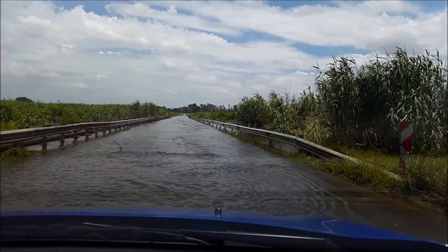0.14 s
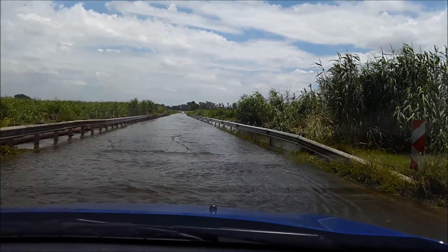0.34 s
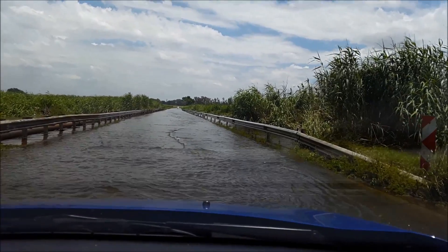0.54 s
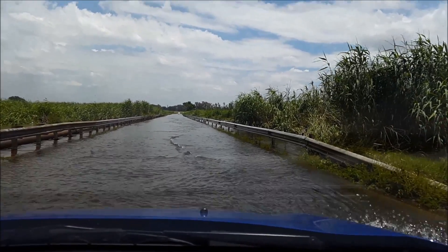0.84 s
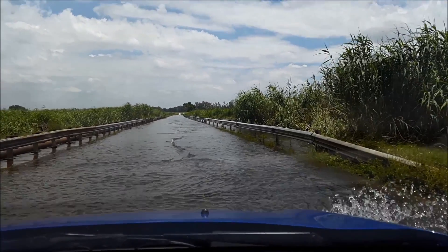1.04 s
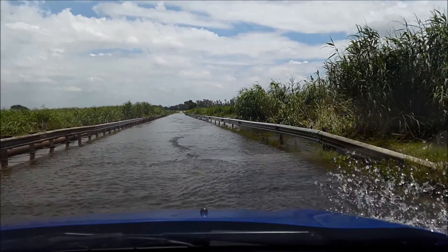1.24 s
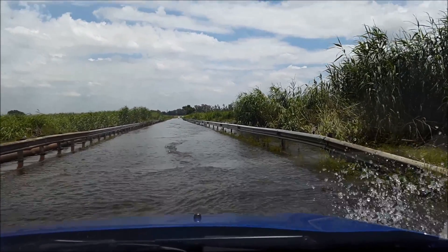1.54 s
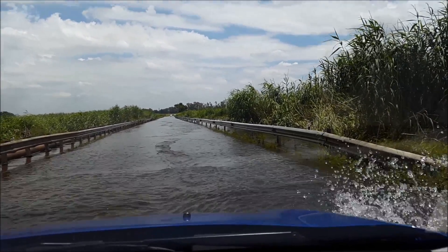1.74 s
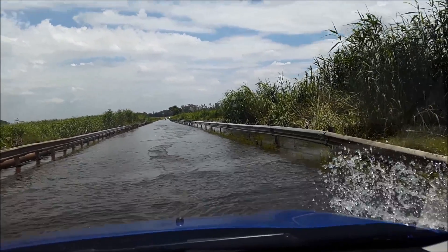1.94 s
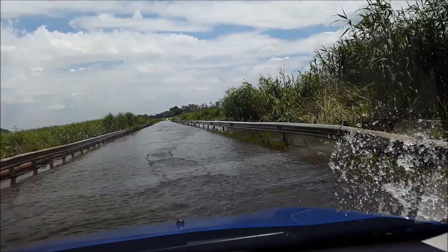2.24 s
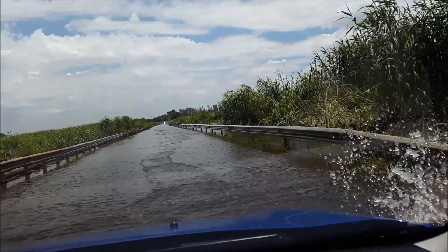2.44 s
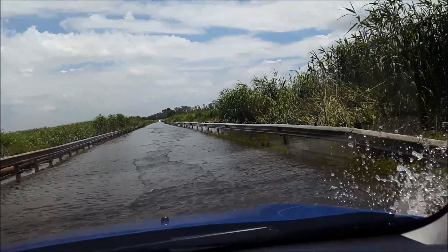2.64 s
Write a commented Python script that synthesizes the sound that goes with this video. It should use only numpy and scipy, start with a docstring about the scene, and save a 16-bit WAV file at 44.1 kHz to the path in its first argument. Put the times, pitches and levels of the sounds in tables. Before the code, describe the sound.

Floodwater sloshes, bubbles and slaps dully against a car driving slowly, heard inside the closed cabin. Deep rumble and soft floor thumps continue throughout, with splashing thickening on the right and a faint steady whirr there.

```python
"""Flood water sloshes and thumps against a car that wades slowly along a flooded road, heard inside.
The right front wheel throws the water up and the closed windows muffle it: coloured noise, bubbles, slaps.
The cabin rumbles in three bands of low noise, and short cosines that swell and fade thump the floor.
Fine spray grows as the water deepens; air gulps in the wheel arch as gliding tones.
A steady narrow noise whirrs far to the right, with a faint hiss and whine above it and one tiny click."""
import sys
import numpy as np
from scipy import signal
from scipy.fft import rfft, irfft
from scipy.io import wavfile
from scipy.ndimage import uniform_filter1d

SR = 44100
rng = np.random.default_rng(int(sys.argv[2]) if len(sys.argv) > 2 else 0)


def int16_out(signal):
    """Quantize to a 16-bit WAV file."""
    q = np.round(np.clip(np.atleast_2d(signal).T, -1, 1) * 32767)
    wavfile.write(sys.argv[1], SR, q.astype(np.int16))


N = 123480
T, HZ = np.arange(N) / SR, np.fft.rfftfreq(N, 1 / SR)


def amp(db):
    """Decibels to gain."""
    return 10 ** (np.asarray(db) / 20)


def evened(x):
    """Scales to an rms of one."""
    return x / np.sqrt(np.mean(x ** 2) + 1e-20)


def read(points, hz):
    """Reads a table over frequency, in straight lines on a log-frequency axis."""
    f, value = np.transpose(points)
    return np.interp(np.log(hz + 1), np.log(f + 1), value)


def level(points):
    """Gain over time from rows of seconds and dB."""
    return amp(np.interp(T, *np.transpose(points)))


def pan(db):
    """Left and right gains of mean power one; positive dB leans left."""
    gains = np.array([amp(np.atleast_1d(db) / 2), amp(-np.atleast_1d(db) / 2)])
    return gains / np.sqrt(np.mean(gains ** 2, 0))


def add(mix, s, sound):
    """Mixes a stereo sound in at a time, cut at the end of the mix."""
    part = mix[:, round(s * SR):][:, :sound.shape[1]]
    part += sound[:, :part.shape[1]]


def alike(a, b, same):
    """Left and right from two independent noises; same = 1 makes the sides equal, 0 unrelated."""
    return np.array([a, same * a + np.sqrt(1 - same ** 2) * b])


def noise(spectrum, same=0, pan_db=0):
    """Stereo noise of rms one with a given colour, likeness of the sides and balance."""
    a, b = rfft(rng.standard_normal((2, N)))
    coloured = alike(a, b, same) * pan(pan_db) * amp(read(spectrum, HZ))
    return evened(irfft(coloured, N))


def wander(rate_hz):
    """Random drift of rms one, slower than about rate_hz and centred on zero."""
    lowpass = np.exp(-(HZ / rate_hz) ** 2) * (HZ > 0)
    return evened(irfft(rfft(rng.standard_normal(N)) * lowpass, N))


def steadied(x, size):
    """Evens out the chance swells of a noise with a running rms over size samples."""
    running_rms = np.sqrt(uniform_filter1d((x ** 2).mean(0), size) + 1e-9)
    return evened(x / running_rms)


def rumble():
    """Low noise bands: the body shudders, the cabin booms, the wet tyres drone; water thumps the floor."""
    # Deep shudder of the car body. Each row: frequency in Hz, relative level in dB per Hz.
    shudder_colour = [(5, -19.5), (14, -5.5), (23, -6), (30, -0.5), (38, 0.5), (50, -24), (90, -47.5),
                      (300, -94.5)]
    # Rise and fall of the shudder. Each row: time in seconds, level in dB.
    shudder_level = [(0, -22), (.15, -42.5), (.3, -26.5), (.55, -31.5), (.75, -29.5), (1.03, -36.5),
                     (1.35, -27.5), (1.45, -35), (1.55, -26), (1.65, -33.5), (2.0, -28), (2.12, -28),
                     (2.35, -30.5), (2.45, -23.5), (2.58, -38), (2.76, -30)]
    # Cabin boom. Each row: frequency in Hz, relative level in dB per Hz.
    boom_colour = [(8, -30.5), (25, -18.5), (45, 0.5), (63, 1), (78, -2), (92, -1), (112, -12.5),
                   (135, -21.5), (200, -43), (600, -94)]
    # Rise and fall of the boom. Each row: time in seconds, level in dB.
    boom_level = [(0, -32.5), (.22, -34.5), (.35, -35.5), (.52, -31), (.62, -34.5), (.72, -34.5),
                  (.85, -32.5), (1.15, -31.5), (1.27, -29.5), (1.48, -31), (1.56, -34), (1.7, -25),
                  (1.78, -34), (1.88, -25.5), (2.08, -27.5), (2.33, -32), (2.46, -30.5), (2.66, -28),
                  (2.78, -32)]
    # Drone of the wet tyres. Each row: frequency in Hz, relative level in dB per Hz.
    drone_colour = [(40, -22), (100, -9), (125, -0.5), (155, 2), (185, -9), (215, -4), (280, -14.5),
                    (450, -27.5), (900, -52.5), (2000, -87.5)]
    # Rise and fall of the drone. Each row: time in seconds, level in dB.
    drone_level = [(0, -41), (.16, -43), (.42, -46.5), (.56, -42.5), (.85, -45), (1.16, -44), (1.38, -46.5),
                   (1.47, -41.5), (1.68, -45), (1.88, -40.5), (2.17, -42), (2.35, -44), (2.64, -41.5),
                   (2.78, -42)]
    # Likeness of the two sides. Each row: frequency in Hz, likeness from 0 to 1.
    likeness = [(20, 0.99), (90, 0.93), (140, 0.65), (220, 0.83), (400, 0.65), (900, 0.51)]
    # Balance of the rumble. Each row: frequency in Hz, left minus right in dB.
    balance = [(20, -0.5), (90, -3), (160, -3), (220, -4.5), (300, -7.5), (900, 0.5)]
    # Heavy water on the floor pan. Each row: swell centre in seconds, level in dB, pitch in Hz.
    thumps = [(0.183, -23, 62), (0.284, -21.5, 52), (0.347, -22.5, 80), (0.407, -19.5, 52),
              (0.8, -27, 95.5), (0.955, -25, 80), (1.293, -24, 50.6), (1.4, -27, 56), (1.562, -21.5, 51.5),
              (1.685, -19.5, 61.3), (1.922, -12.5, 50.5), (2.021, -20.5, 54.8), (2.096, -16, 49.8),
              (2.191, -21, 57.7), (2.415, -22, 54.7), (2.545, -22, 76), (2.705, -20, 62)]
    thump_half_s, thump_pan_db = .016, -2
    takeover = .45  # share of the steady boom that gives way to a thump

    same, side = read(likeness, HZ), read(balance, HZ)
    shudder = steadied(noise(shudder_colour, same, side), size=4000) * level(shudder_level)
    boom = steadied(noise(boom_colour, same, side), size=2400) * level(boom_level)
    drone = steadied(noise(drone_colour, same, side), size=3500) * level(drone_level)
    for s, db, hz in thumps:
        swell = np.exp(-((T - s) / thump_half_s) ** 2)
        thump = -pan(thump_pan_db) * amp(db) * np.cos(2 * np.pi * hz * (T - s))
        boom = boom * (1 - takeover * swell) + thump * swell
    return shudder + boom + drone


def bubbles():
    """A swarm of short rising rings at random times; each pitch has its own place."""
    per_s, pitches, decay_cycles = 260, 24, 5.6  # per_s counts all pitches together
    spread_db = 1  # scale of a bubble's random boost, capped at three times this
    out, t = np.zeros((2, N)), np.arange(SR // 10) / SR
    for hz in np.geomspace(327.4, 1022, num=pitches):
        age = t * hz / decay_cycles
        rising = np.sin(2 * np.pi * hz * t * (1 + 0.036 * age))
        ring = (1 - np.exp(-age * 4)) * np.exp(-age) * rising
        hits = rng.random(N) < per_s / pitches / SR
        sizes = amp(spread_db * np.minimum(rng.exponential(1, N), 3))
        voice = signal.oaconvolve(hits * sizes, ring)[:N] * hz ** -.6  # higher pitches are weaker
        place, polarity = pan(rng.normal(-7.5, 5.9)), rng.choice([-1, 1], (2, 1))
        out += place * polarity * voice
    return evened(out)


def wash():
    """Churning noise and bubbles under the car swell together; spray grows as the water deepens."""
    # Water heard through the body. Each row: frequency in Hz, relative level in dB per Hz.
    churn_colour = [(100, -24), (250, 1), (370, 4), (500, -5.5), (680, -4.5), (850, -8.5), (1020, -14),
                    (1250, -19), (1550, -18.5), (2100, -24), (2500, -29), (2950, -37.5), (3600, -47.5),
                    (4500, -58), (8000, -67.5)]
    # Balance of the churn. Each row: frequency in Hz, left minus right in dB.
    churn_balance = [(250, -5), (400, -5.5), (550, -6.5), (700, -9), (1000, -7.5), (1500, -6.5), (3000, -6)]
    # Swell of churn and bubbles together. Each row: time in seconds, level in dB.
    wash_level = [(0, -56.5), (.2, -58), (.45, -54.5), (.7, -54), (1, -54), (1.25, -53.5), (1.4, -55),
                  (1.53, -53.5), (1.72, -54.5), (1.87, -53), (2.08, -53), (2.2, -50.5), (2.32, -52.5),
                  (2.4, -50), (2.52, -50), (2.78, -53)]
    # Fine spray on the side of the car. Each row: frequency in Hz, relative level in dB per Hz.
    spray_colour = [(800, -16), (1500, 3), (2300, 2), (2900, -13.5), (3600, -16), (4500, -31),
                    (8000, -41.5)]
    # Growth of the spray. Each row: time in seconds, level in dB.
    spray_level = [(0, -86.5), (1.1, -81), (1.8, -74.5), (2, -73), (2.45, -73.5), (2.78, -72)]
    bubbles_db = -10  # against the churn

    churn = noise(churn_colour, same=0.26, pan_db=read(churn_balance, HZ))
    churn = churn * amp(0.68 * wander(rate_hz=19))
    spray = noise(spray_colour, pan_db=-6) * level(spray_level)
    spray = spray * amp(1.6 * wander(rate_hz=45))
    return (churn + amp(bubbles_db) * bubbles()) * level(wash_level) + spray


def whirr():
    """A narrow, fluttering band of noise, far to the right, with a few brief rises in level."""
    # Colour of the whirr. Each row: frequency in Hz, relative level in dB per Hz.
    whirr_colour = [(900, -42), (1400, -20.5), (1600, -8.5), (1770, -10), (1900, 0), (2050, 2), (2200, 0.4),
                    (2400, -7.5), (2650, -13), (2780, -27), (2900, -36.5), (3150, -44.5), (3520, -38),
                    (4000, -56), (6000, -82)]
    # Slow changes of the whirr. Each row: time in seconds, level in dB.
    whirr_level = [(0, -50), (.55, -49), (1.28, -49.5), (1.43, -50.5), (1.55, -49.5), (1.75, -50.5),
                   (1.93, -49), (2.25, -49.5), (2.6, -49.5), (2.78, -50.5)]
    # Brief rises in level. Each row: centre in seconds, rise in dB, half length in seconds.
    brief_rises = [(1.135, 8, 0.004), (1.266, 5, 0.0064), (1.945, 6.5, 0.0061)]
    left_db = -29  # against the right

    flutter_db = 0.49 * wander(rate_hz=69)
    for s, rise_db, half_s in brief_rises:
        flutter_db = flutter_db + rise_db * np.exp(-((T - s) / half_s) ** 2)
    return noise(whirr_colour) * amp([[left_db], [0]]) * level(whirr_level) * amp(flutter_db)


def hiss_and_whine():
    """Faint high noise with a thin sine whose pitch wavers at random."""
    # Colour of the hiss. Each row: frequency in Hz, relative level in dB per Hz.
    hiss_colour = [(1000, -33), (4200, -31), (5000, -21), (6000, -12.5), (7000, -7.5), (7650, -3),
                   (7930, 4), (8130, -1.5), (8450, 4), (9000, -11)]
    hiss_db, whine_db, whine_pan_db = -68.5, -78.5, -21.5
    whine_hz = 7960 + 6 * wander(rate_hz=23)

    whine = np.sin(2 * np.pi * np.cumsum(whine_hz) / SR)
    hiss = amp(hiss_db) * noise(hiss_colour, pan_db=-0.5)
    return hiss + amp(whine_db) * pan(whine_pan_db) * evened(whine)


def splashes():
    """Dull slaps of water in the wheel arch: soft-edged noise bursts, each around its own pitch."""
    # Slaps of water. Each row: start in seconds, level in dB, centre in Hz.
    slaps = [(.262, -38, 420), (.795, -40, 400), (.945, -42, 700), (1.055, -47, 602), (1.106, -36.5, 413),
             (1.252, -35, 570), (1.35, -33, 360), (1.465, -37.5, 595), (1.497, -44, 505), (1.53, -39, 450),
             (1.972, -45, 500), (2.008, -38.5, 480), (2.163, -36, 540), (2.222, -33, 520),
             (2.275, -38, 402), (2.345, -36.5, 480), (2.379, -34.5, 620), (2.595, -43.5, 450),
             (2.642, -34, 380), (2.742, -37, 360)]
    rise_s, t60_s, half_octaves, pan_db = 0.0092, 0.091, 0.54, -6

    out, t = np.zeros((2, N)), np.arange(SR // 5) / SR
    hz = np.fft.rfftfreq(len(t), 1 / SR) + 1  # kept above zero for the logarithm
    rise = 1 - np.exp(-t / rise_s)
    for s, db, centre in slaps:
        colour = np.exp(-(np.log2(hz / centre) / half_octaves) ** 2)
        a, b = irfft(rfft(rng.standard_normal((2, len(t)))) * colour, len(t))
        burst = steadied(alike(a, b, same=0.17), size=900)
        add(out, s, pan(pan_db) * burst / 2 * rise * amp(db - 60 * t / t60_s))
    return out


def tick():
    """One tiny sharp click of trim: a noise burst with a faint, slower tail from the cabin."""
    # Colour of the click. Each row: frequency in Hz, relative level in dB.
    click_colour = [(1500, -14.5), (3300, -0.5), (4000, -13), (4700, -3), (5500, -5), (6500, 10),
                    (7500, -0.5), (9000, -1)]
    start_s, rise_s, click_db, pan_db = .8405, 0.00058, -56.5, -14
    t60_s, tail_db, tail_t60_s = 0.018, -14, .09  # the tail level is against the click

    age = np.maximum(T - start_s, 0)
    fade = amp(-60 * age / t60_s) + amp(tail_db - 60 * age / tail_t60_s)
    rise = np.minimum(age / rise_s, 1)
    return noise(click_colour, pan_db=pan_db) * rise * amp(click_db) * fade


def gurgle():
    """Air gulps in the wheel arch: large bubbles ring in a run, gliding up as they near the surface."""
    # Run of large bubbles. Each row: start in seconds, level in dB, starting pitch in Hz.
    gulps = [(1.527, -59, 820), (1.531, -54.5, 1240), (1.545, -51, 1007), (1.576, -53.5, 890),
             (1.585, -47.5, 1027), (1.596, -55.5, 1246), (1.611, -55, 905)]
    rise_s, t60_s, pan_db = 0.0073, 0.1, -3
    glide_per_s, roughness = 1.8, 0.43  # glide as a share of the starting pitch

    out, t = np.zeros((2, N)), np.arange(SR // 8) / SR
    for s, db, hz in gulps:
        turns = np.cumsum(hz * (1 + glide_per_s * t)) / SR + rng.random()
        rough = evened(1 + roughness * wander(rate_hz=180)[:len(t)])
        ring = rough * np.sin(2 * np.pi * turns) * (1 - np.exp(-t / rise_s))
        add(out, s, pan(pan_db) * ring * amp(db - 60 * t / t60_s))
    return out


def scene():
    """Everything heard behind the windscreen."""
    return rumble() + wash() + whirr() + hiss_and_whine() + splashes() + tick() + gurgle()


def record(dry):
    """The recorder's band limit: a steep low-pass without delay."""
    lowpass = signal.firwin(801, 8530, window=("kaiser", 9), fs=SR)  # cutoff in Hz
    padded = np.pad(dry, ((0, 0), (400, 400)), "reflect", reflect_type="odd")  # half the filter each end
    return signal.oaconvolve(padded, lowpass[None], "valid")


dry = scene()
out = record(dry)
int16_out(out)
```